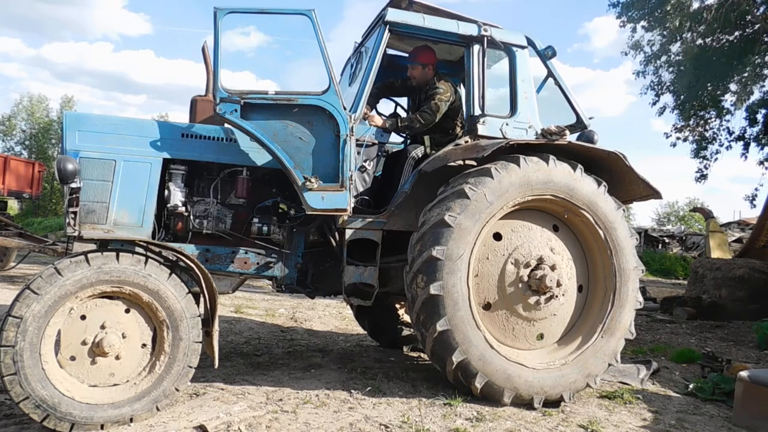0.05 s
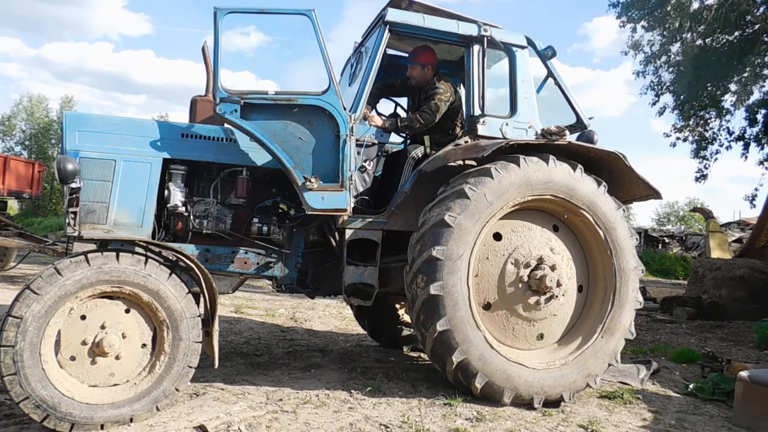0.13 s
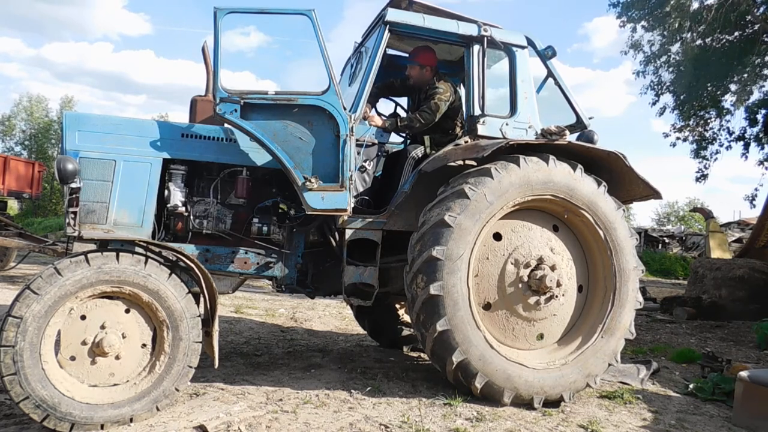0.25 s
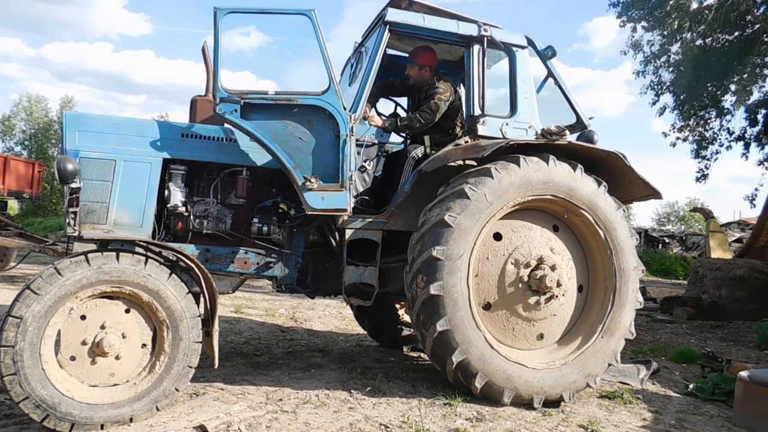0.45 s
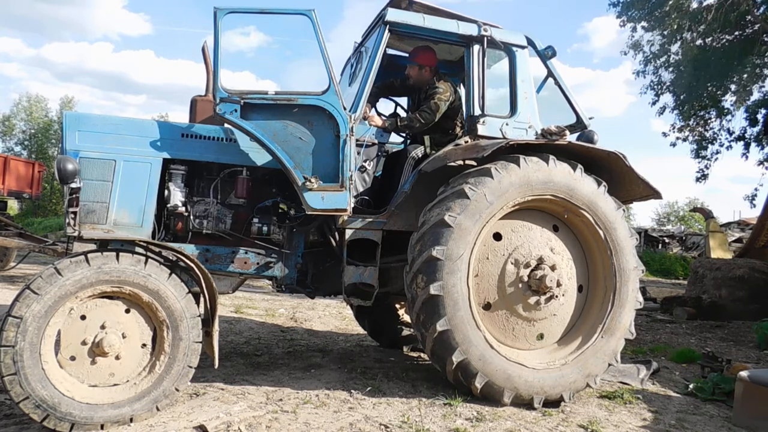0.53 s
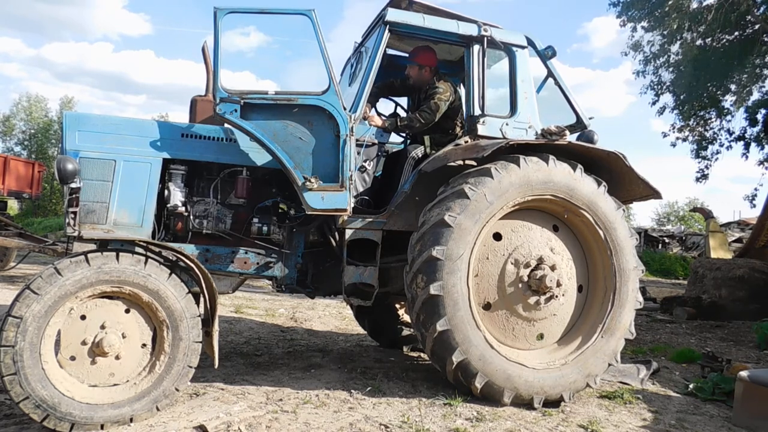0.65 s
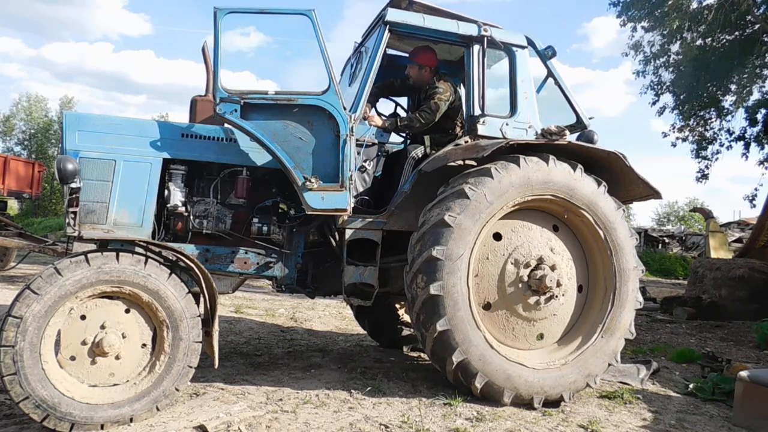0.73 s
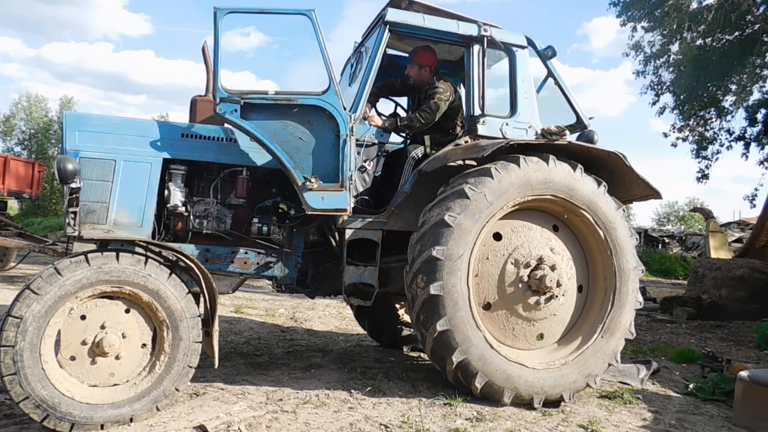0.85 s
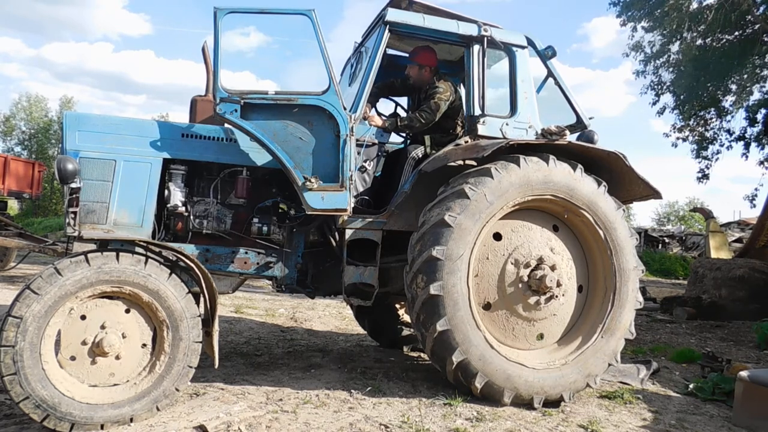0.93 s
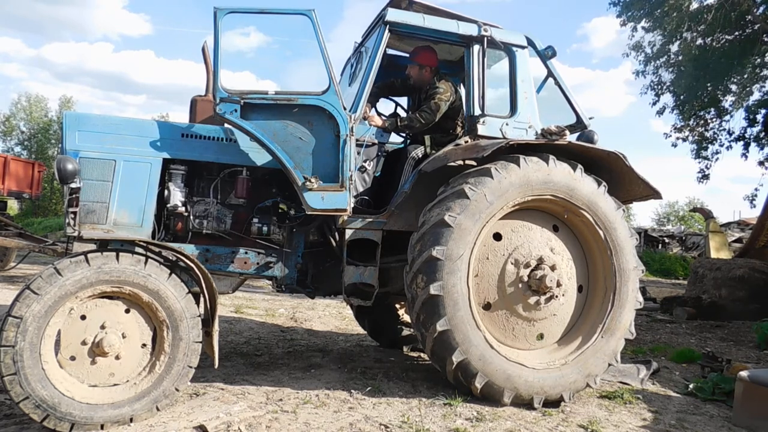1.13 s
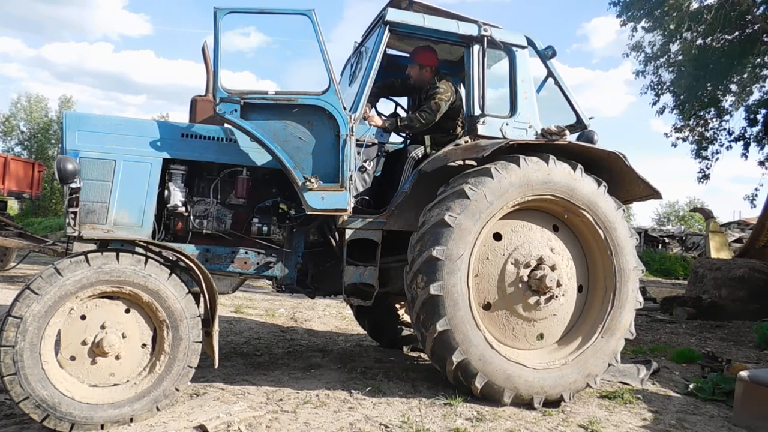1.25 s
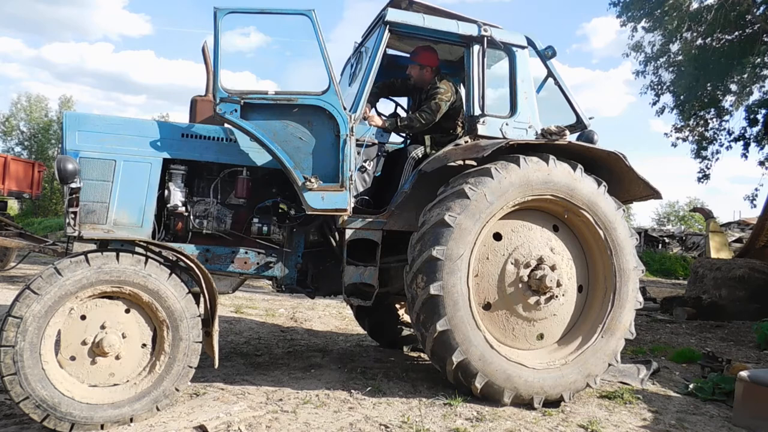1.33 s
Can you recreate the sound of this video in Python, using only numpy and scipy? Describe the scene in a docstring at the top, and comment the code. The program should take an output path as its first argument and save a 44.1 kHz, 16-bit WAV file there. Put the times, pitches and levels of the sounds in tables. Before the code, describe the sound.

Tractor starter motor grinding and whining outdoors, surging twice and nearly stalling, the engine never catching.

```python
"""An electric starter cranks a tractor engine in an open yard; the engine does not fire.
The solenoid slams the pinion in and its teeth grind and whine on the ring gear, racing between
compressions and labouring on each. The engine nearly stalls on the second compression, something ticks,
and the gears begin to turn again. A body panel hums along; the yard adds a dull echo and a low rumble."""
import sys
import numpy as np
from scipy import signal
from scipy.fft import rfft, irfft
from scipy.io import wavfile
from scipy.ndimage import uniform_filter1d

SR = 44100
rng = np.random.default_rng(int(sys.argv[2]) if len(sys.argv) > 2 else 0)


def wav_out(sig):
    """Save sig, one row per channel (or a flat mono array), as 16-bit PCM at SR to the path in sys.argv[1]."""
    wavfile.write(sys.argv[1], SR, np.round(np.clip(np.atleast_2d(sig).T, -1, 1) * 32767).astype(np.int16))


N = 61739
T = np.arange(N) / SR
HZ = np.maximum(np.arange(N // 2 + 1) * SR / N, 1)
JUDDER_HZ = 70.23  # how fast speed, tooth force and hum pitch waver

# The bright colour of steel hitting steel. Each row: frequency in Hz, relative level in dB.
CLACK_SPECTRUM = [(100, -46), (700, -20), (1250, 7.5), (1800, -7.5), (2400, 5), (3100, -7.5), (3900, 0),
                  (4700, -8.5), (5800, -5.5), (7500, -15.5), (11500, -13), (15500, -24)]


def gears(teeth, mids_db, upper_db, treble_db):
    """Tooth blows grind, the tips chatter and the flanks rasp, all setting the housing ringing."""
    # The colours of grind, chatter and rasp. Each row: frequency in Hz, relative level in dB.
    grind = [(60, -57), (150, -47), (280, -36), (345, -36), (450, -37), (600, -15.5), (720, -2.5), (950, 0),
             (1220, 5), (1480, -2.5), (1800, -14), (3000, -47), (15500, -75)]
    chatter = [(200, -60), (900, -16.5), (1550, 2.5), (1720, 0), (2000, 3), (2350, 0), (2650, -5.5),
               (2950, -11), (3200, -9.5), (5000, -21.5), (6100, -16.5), (7500, -34), (15500, -55)]
    rasp = [(200, -54), (1400, -6), (2400, 2), (3400, -5.5), (4800, 1.5), (5400, -2.5), (6100, 5.5),
            (7200, -6.5), (8400, -8.5), (10200, -3.5), (12000, -14.5), (15500, -18)]
    clicks = tooth_clicks(teeth)
    ringing = housing(clicks, mids_db, upper_db)
    catches = pinion_catches(clicks)
    layers = (grind, mids_db - 3.5), (chatter, upper_db - 1.5), (rasp, treble_db - 2)
    meshing = sum(radiate(colour(clicks, spectrum)) * from_db(db) for spectrum, db in layers)
    return meshing + ringing + catches


def tooth_clicks(teeth, jitter_s=.00012, unevenness_db=3.5, judder_db=1.5):
    """One click per meshing tooth, uneven in time and strength, as loud at low speed as at high."""
    onsets = np.flatnonzero(np.diff(np.floor(teeth)))
    lateness, strength = rng.standard_normal((len(onsets), 2)).T
    onsets += (lateness * jitter_s * SR).astype(int)
    clicks = np.zeros(N)
    clicks[np.clip(onsets, 0, N - 1)] = from_db(unevenness_db * strength)
    local_power = np.abs(uniform_filter1d(clicks ** 2, size=1500))
    return clicks / np.sqrt(local_power + 1e-6) * from_db(judder_db * drift(JUDDER_HZ))


def housing(clicks, mids_db, upper_db):
    """The teeth rattle the flywheel housing: low modes follow the grind, high modes the chatter."""
    # Housing and panel modes. Each row: frequency in Hz, relative level in dB, seconds to fall 60 dB.
    modes = [(336, -67, 0.45), (463, -66, 0.39), (700, -21, 0.28), (757, -25, 0.26), (1032, -21, .07),
             (1057, -23, .07), (1160, -19, .05), (1257.5, -19, .05), (1348, -20, .07), (1504, -20.5, 0.24),
             (1861, -14.5, 0.13), (2177, -21, 0.24), (2281, -18.5, 0.12), (2824, -12.5, 0.13),
             (2914, -18.5, 0.11)]
    rattle = colour(clicks * rng.standard_normal(N), [(60, -26), (300, -3.5)])
    ringing = np.zeros(N)
    for hz, db, t60 in modes:
        drive = rattle * from_db(upper_db if hz > 1700 else mids_db)
        ringing += from_db(db) * ring(drive, hz, t60) / np.std(ring(rattle, hz, t60))
    return radiate(ringing)


def pinion_catches(clicks):
    """Teeth catch in short, bright bursts as the pinion seats."""
    # The catches. Each row: start in seconds, level in dB.
    catches = [(0.317, -26.5), (0.344, -19.5), (0.365, -26)]
    bursts = sum(from_db(db) * blow(start, decay_s=.0057) for start, db in catches)
    return bursts * radiate(colour(clicks, CLACK_SPECTRUM))


def whine(teeth, mids_db, treble_db, pinion_teeth=11):
    """Side tones and overtones glide with the speed and light up as they cross housing resonances."""
    # Side tones of the uneven pinion: multiples of its turning rate, and their relative levels in dB.
    side_orders = [5, 7, 8, 10, 11, 13, 14, 15, 19, 22, 23]
    side_db = [3, -10, 0, -3, -2, -1, -0.5, -8, -5, 5, -9]
    # What the housing passes of side tones and of overtones. Each row: frequency in Hz, relative dB.
    growl_spectrum = [(150, -44), (280, -46), (345, -13), (410, -20.5), (490, -8), (570, -14), (700, -3.5),
                      (850, -6), (1150, 7), (1350, 5.5), (1650, -8), (1900, 4.5), (2250, 0.5), (2600, -10)]
    whine_spectrum = [(800, -43), (2300, -4.5), (2840, 0), (3050, -29), (3330, 4.5), (3550, -4),
                      (3770, -2.5), (4100, 3.5), (4400, -6.5), (4720, 0), (5200, -8.5), (5520, -3),
                      (6000, 6), (6600, -9.5), (7400, -19), (9300, -10), (11000, -12.5), (15000, -34)]
    shaken = teeth + .009 * drift(200)
    side_tones = sum(tone(k * shaken / pinion_teeth, db) for k, db in zip(side_orders, side_db))
    growl = colour(side_tones, growl_spectrum)
    overtones = sum(tone(k * shaken, 0) for k in range(3, 13))
    whines = [colour(casing(overtones), whine_spectrum) for _ in range(2)]
    return spread(growl, scatter(growl)) * from_db(mids_db - 4.5) + spread(*whines) * from_db(treble_db)


def tone(cycles, db, flutter_db=2.5, flutter_hz=45):
    """A gliding partial whose strength flutters."""
    return from_db(db + flutter_db * drift(flutter_hz)) * np.sin(2 * np.pi * (cycles + rng.random()))


def casing(x, ring_s=.0035):
    """The many close modes of the casing make a gliding tone flare and break up."""
    paths = rng.standard_normal(N) * np.exp(-T / ring_s)
    return signal.fftconvolve(x, paths)[:N]


def backlash_knocks():
    """As the load changes sides, the teeth knock and ring the housing's main mode."""
    # The knocks. Each row: start in seconds, strength in dB.
    knocks = [(0.2514, -13.5), (.272, -19), (.283, -18), (.297, -16), (.739, -14), (.771, -17),
              (1.054, -18), (1.065, -20)]
    hits = np.zeros(N)
    for start, db in knocks:
        hits[int(start * SR)] = from_db(db)
    band = signal.butter(2, [950, 1550], "band", fs=SR, output="sos")
    return signal.sosfilt(band, ring(hits + 1e-18, hz=1220, t60=.03))


def solenoid():
    """The solenoid throws the pinion in with a hard clack and a few bounces."""
    # The blows. Each row: start in seconds, level in dB, decay to 1/e in seconds.
    clacks = [(0.2126, -29.5, 0.0028), (.2155, -9.5, 0.0026), (0.2205, -48, 0.0016), (0.23, -34, 0.0014)]
    return impacts(clacks, CLACK_SPECTRUM)


def tick():
    """One light tick while the engine is almost at rest."""
    # The tick's colour. Each row: frequency in Hz, relative level in dB.
    spectrum = [(1000, 5), (2500, -2), (4000, -7), (6000, -4.5), (10000, -10), (15000, -11)]
    return impacts([(1.175, -34.5, .005)], spectrum)


def impacts(hits, spectrum, tail_db=-21, tail_s=.016):
    """Each hit is a snap of noise with a faint tail, thinned out in the bass."""
    envelope = sum(from_db(db) * (blow(start, decay_s) + from_db(tail_db) * blow(start, tail_s))
                   for start, db, decay_s in hits)
    low_cut = signal.butter(2, 600, "high", fs=SR, output="sos")
    return signal.sosfilt(low_cut, envelope * noise(spectrum))


def compressions():
    """Each compression shakes the tractor with a soft, deep thud."""
    # The strokes. Each row: peak time in seconds, width in seconds, level in dB.
    strokes = [(0.614, 0.096, -51.5), (1.086, 0.093, -52)]
    # The thud's colour. Each row: frequency in Hz, relative level in dB.
    thud = [(20, -8.5), (33, -6), (60, -21), (110, -12), (180, -13), (300, -11), (1000, -51)]
    swells = sum(from_db(db) * np.exp(-((T - peak) / width) ** 2 / 2) for peak, width, db in strokes)
    return noise(thud) * swells


def panel_hum(pitch_hz=230.3, wander_hz=7.5):
    """One panel resonance, shaken by the starter, swells and fades."""
    # The hum's swells. Each row: time in seconds, level in dB.
    swells = [(.22, -75), (.36, -56), (.44, -46.5), (.48, -45), (.52, -72), (.575, -51.5), (.7, -52),
              (.78, -72), (.83, -50.5), (.93, -79), (.975, -53), (1.01, -59.5), (1.075, -46.5), (1.13, -67),
              (1.3, -67.5)]
    hum_db, = in_time(swells)
    cycles = np.cumsum(pitch_hz + wander_hz * drift(JUDDER_HZ)) / SR
    return np.sqrt(2) * from_db(hum_db) * np.sin(2 * np.pi * cycles)


def yard_echo(x, gain_db=-9.5):
    """The yard returns a short, dull tail."""
    # What the yard reflects. Each row: frequency in Hz, relative level in dB.
    reflected = [(150, -33), (450, 2.5), (850, 0), (1100, -17), (3000, -22)]
    tails = rng.standard_normal((2, N)) * blow(start=.03, decay_s=.049)
    dull = irfft(rfft(x.mean(axis=0)) * from_db(at_hz(reflected) + gain_db), N)
    return spread(*[signal.fftconvolve(dull, tail / np.linalg.norm(tail))[:N] for tail in tails])


def yard_rumble(level_db=-47.5):
    """A steady, low bed of outdoor noise."""
    # The yard's colour. Each row: frequency in Hz, relative level in dB.
    spectrum = [(20, -7), (45, -2), (110, -11), (200, -10), (300, -13.5), (600, -2), (1020, -2.5),
                (1500, -7), (2100, -13), (3900, -18), (8000, -30), (15500, -39)]
    return from_db(level_db) * noise(spectrum)


def radiate(x):
    """A vibration reaches left and right by way of the engine block."""
    return spread(scatter(x), scatter(x))


def scatter(x, smear_s=.005):
    """Smear a sound over many short paths through the metal, without colouring it."""
    paths = rfft(rng.standard_normal(N) * np.exp(-T / smear_s))
    return irfft(rfft(x) * paths / np.abs(paths), N)


def spread(mid, side, right_lag_s=.000012):
    """Two unrelated versions of a sound become left and right, less alike in the treble."""
    # Stereo width. Each row: frequency in Hz, left-right likeness (capped below at .97).
    likeness = [(60, 1.6), (250, 4), (700, .965), (1300, .965), (2200, .93), (4000, 0.17), (7000, 0.5),
                (15000, 0.3)]
    # Stereo lean. Each row: frequency in Hz, left minus right in dB.
    balance = [(100, 2.3), (700, .2), (1290, 1.1), (2380, -1.4), (4400, 1), (8120, 2.5), (15000, 9.5)]
    alike, lean_db = np.clip(at_hz(likeness), -.97, .97), at_hz(balance) / 2
    common = rfft(mid) * np.sqrt((1 + alike) / 2)
    apart = rfft(side) * np.sqrt((1 - alike) / 2)
    left = (common + apart) * from_db(lean_db)
    right = (common - apart) * from_db(-lean_db) * np.exp(-2j * np.pi * HZ * right_lag_s)
    return irfft(np.array([left, right]), N)


def ring(x, hz, t60):
    """One mode driven by x, dying away by 60 dB in t60 seconds."""
    radius, angle = from_db(-60 / (t60 * SR)), 2 * np.pi * hz / SR
    return signal.lfilter([0, np.sin(angle)], [1, -2 * radius * np.cos(angle), radius ** 2], x)


def blow(start, decay_s):
    """Sudden rise, exponential fall."""
    return (T >= start) * np.exp(-np.maximum(T - start, 0) / decay_s)


def noise(spectrum):
    """Coloured stereo noise."""
    return spread(*colour(rng.standard_normal((2, N)), spectrum))


def colour(x, spectrum):
    """Give a sound a spectrum, at unit power."""
    return rms_one(irfft(rfft(x) * from_db(at_hz(spectrum)), N))


def drift(rate_hz):
    """A random waver of unit power, mostly slower than rate_hz."""
    return rms_one(irfft(rfft(rng.standard_normal(N)) / (1 + (HZ / rate_hz) ** 2), N))


def in_time(rows):
    """The columns of a timed curve at every sample."""
    times, *columns = np.transpose(rows)
    return [np.interp(T, times, column) for column in columns]


def at_hz(points):
    """A table read at every frequency."""
    hz, value = np.transpose(points)
    return np.interp(np.log(HZ), np.log(hz), value)


def rms_one(x):
    """Scale to unit power."""
    return x / np.sqrt(np.mean(x ** 2) + 1e-20)


def from_db(db):
    """Decibels to gain."""
    return 10 ** (np.asarray(db) / 20)


def scene():
    """The starter races and labours over the low rumble of the yard."""
    # Cranking speed. Each row: time in seconds, teeth meshing per second.
    speed = [(.24, 330.4), (.3, 608.2), (.346, 818.3), (.384, 934.2), (.44, 955.8), (.474, 929.5),
             (.505, 836.1), (.53, 720.9), (.596, 390.1), (.66, 365.3), (.725, 545), (.786, 845.7),
             (.83, 1023), (.858, 1096), (.895, 1110), (.932, 1077), (.976, 934), (1.0, 758.8),
             (1.05, 468.1), (1.12, 150.2), (1.4, 261)]
    # Level rides for the gears. Each row: time in seconds, then mids, upper mids and treble in dB.
    effort = [(.21, -77, -71, -93), (.225, -23.5, -22.5, -59), (.245, -26.5, -37, -41.5),
              (.3, -23.5, -25.5, -36), (.35, -24, -26.5, -33), (.45, -23.5, -24.5, -29.5),
              (.52, -24.5, -23, -32), (.566, -22.5, -26.5, -39), (.61, -25.5, -32, -46.5),
              (.66, -28.5, -33, -52), (.705, -26.5, -31, -48), (.74, -25.5, -27, -41),
              (.78, -26.5, -26, -33), (.89, -24.5, -29.5, -29), (.98, -22, -22.5, -30),
              (1.05, -22.5, -29, -45), (1.09, -41, -48, -61), (1.15, -49, -51, -63),
              (1.35, -42, -54.5, -69), (1.4, -31, -41.5, -56)]
    mesh_hz, = in_time(speed)
    mids_db, upper_db, treble_db = in_time(effort)
    teeth = np.cumsum(mesh_hz * (1 + .004 * drift(JUDDER_HZ))) / SR  # running count of teeth meshed
    starter = gears(teeth, mids_db, upper_db, treble_db) + whine(teeth, mids_db, treble_db)
    starter += backlash_knocks() + solenoid() + tick()
    return starter + yard_echo(starter) + panel_hum() + compressions() + yard_rumble()


def record(dry):
    """The top is cut steeply above 15.9 kHz."""
    return signal.sosfilt(signal.ellip(10, .2, 80, 15900, fs=SR, output="sos"), dry)


dry = scene()
out = record(dry)
wav_out(out)
```